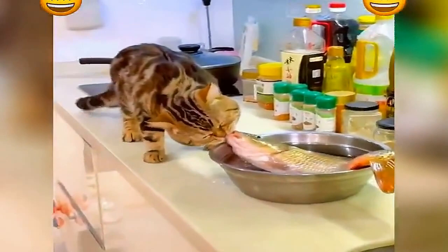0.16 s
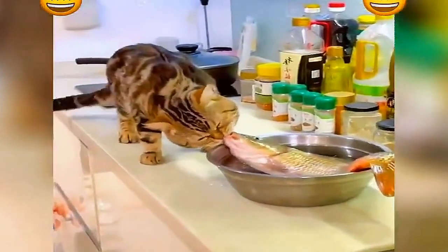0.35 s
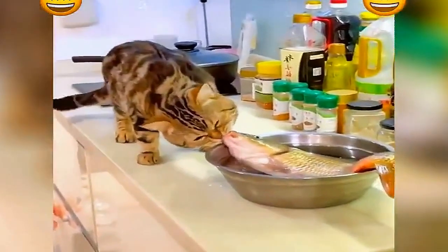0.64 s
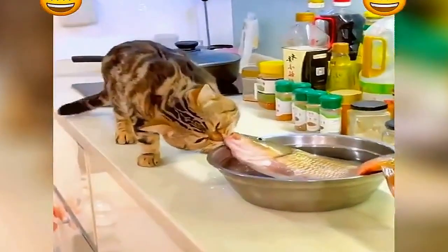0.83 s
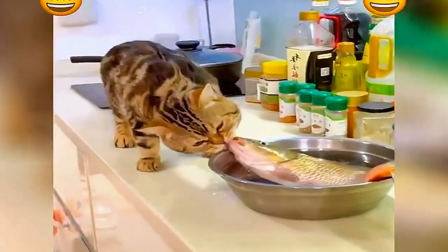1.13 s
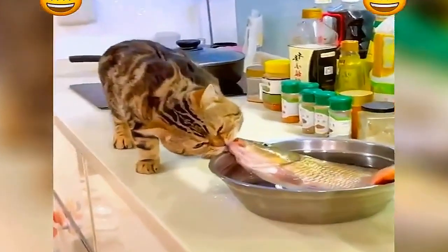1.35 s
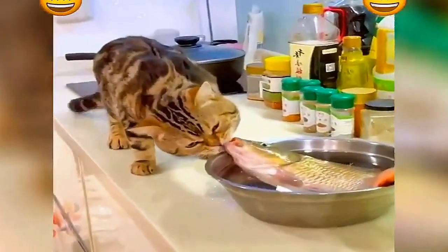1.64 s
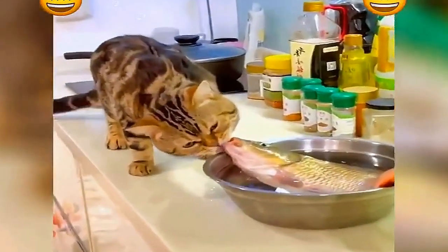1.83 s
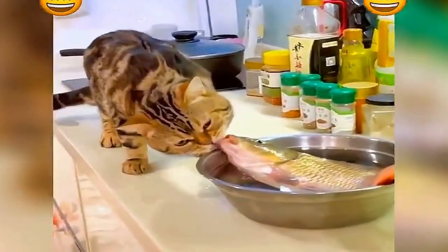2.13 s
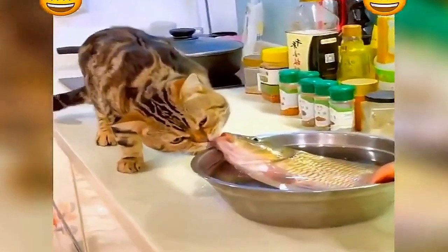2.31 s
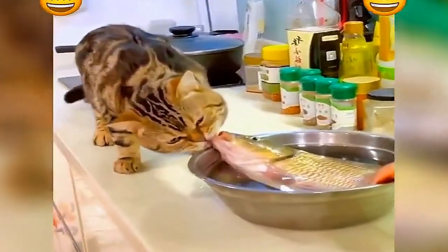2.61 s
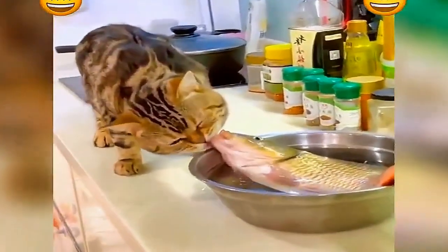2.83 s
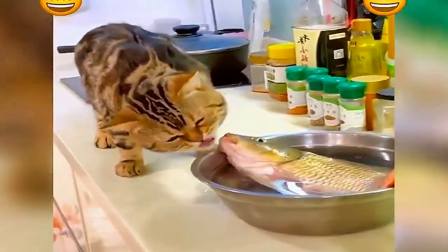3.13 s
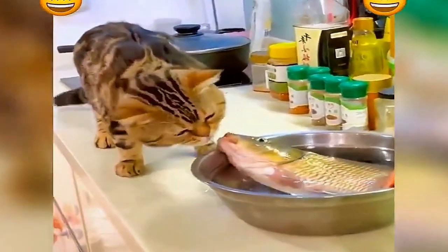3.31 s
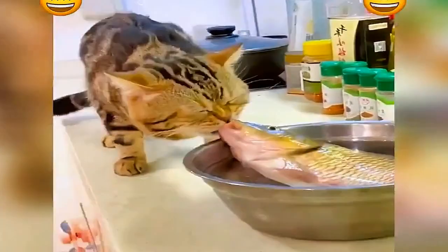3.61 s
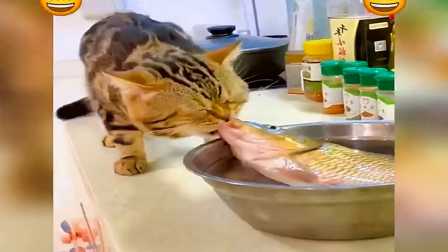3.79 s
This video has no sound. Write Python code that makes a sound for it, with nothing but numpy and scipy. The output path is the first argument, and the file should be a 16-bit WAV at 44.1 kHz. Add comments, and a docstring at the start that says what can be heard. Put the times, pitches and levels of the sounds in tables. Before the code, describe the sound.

A cat growls through a mouthful of raw fish, a low hum with rapid throaty flutter, from 0 to 1.1 seconds, 1.25 to 3.2, and 3.35 to the end. Chews briefly brighten it; wet clicks cluster around 1.3-2.0. Dull knocks fall near 0.9 and 2.2, sniffs near 1.3 and 3.3. The growl peaks harshly around 3.5, then breaks into a higher whine at 3.7. Close, dry kitchen, faint rumble.

```python
"""In a kitchen, a cat growls through its teeth while it gnaws a raw fish on the counter.
The growl is a low hum with rough pulses, shaken by a flutter in the throat; each chew opens the mouth
and lets the upper resonances out. It stops twice and at last breaks into a higher whine.
Noise bursts make the wet bites and two sharp ticks, random snaps the squelch, filtered noise the sniffs
and the room's faint rumble, and decaying low sines the knocks."""
import sys
import numpy as np
from scipy import signal
from scipy.fft import rfft, irfft
from scipy.io import wavfile
from scipy.ndimage import uniform_filter1d

SR = 44100
rng = np.random.default_rng(int(sys.argv[2]) if len(sys.argv) > 2 else 0)


def wav_record(signal):
    """Record a signal, one row per channel, as 16-bit PCM in the file named by sys.argv[1]."""
    frames = np.transpose(np.atleast_2d(signal))
    bounded = np.clip(frames, -1, 1)
    # unit amplitude maps onto the largest positive 16-bit level
    quanta = np.round(bounded * 32767).astype(np.int16)
    wavfile.write(sys.argv[1], SR, quanta)


N = 174195
T = np.arange(N) / SR  # seconds

# Glide of the growl's pitch. Each row: time in seconds, pitch in Hz before jitter.
GROWL_PITCH = [(0, 203), (.07, 236), (.13, 197), (.28, 203), (.335, 222), (.47, 179), (.53, 189), (.6, 177),
               (.645, 216), (.76, 173), (.88, 190), (.97, 208), (1.05, 194), (1.35, 182), (1.41, 160),
               (1.5, 187), (1.61, 186), (1.65, 170), (1.7, 184), (1.77, 166), (1.88, 161), (1.96, 207),
               (2.14, 166), (2.19, 188), (2.25, 170), (2.34, 208), (2.45, 165), (2.56, 182), (2.61, 165),
               (2.7, 170), (2.77, 184), (2.92, 161), (2.99, 196), (3.16, 181), (3.42, 175), (3.56, 201)]
# Swell of the growl's fundamental. Each row: time in seconds, level in dB before trim and waver.
HUM_LEVEL = [(0, -18), (.05, -22), (.24, -16), (.37, -20.5), (.55, -11.5), (.65, -22), (.78, -14),
             (.88, -13), (1.03, -23), (1.08, -19), (1.28, -25.5), (1.37, -21.5), (1.62, -20), (1.69, -13),
             (1.87, -20), (1.92, -12), (1.98, -21), (2.03, -15), (2.08, -20), (2.2, -13), (2.33, -19),
             (2.4, -14.5), (2.5, -18.5), (3.0, -17.5), (3.09, -13), (3.17, -15), (3.35, -22), (3.48, -13.5),
             (3.63, -18), (3.72, -46)]
# Ring of the throat. Each row: time in seconds, low resonances in dB, hollow resonance above them in dB.
THROAT_LEVELS = [(0, -27.5, -46), (.2, -32, -41), (.34, -28.5, -41), (.47, -33, -53), (.65, -29, -41.5),
                 (.8, -34, -41.5), (.98, -26.5, -37), (1.08, -40.5, -56), (1.26, -45, -59),
                 (1.6, -37.5, -52), (2.0, -30, -38), (2.2, -33.5, -42), (2.38, -28, -36), (2.55, -29, -38),
                 (2.849, -29.5, -37), (3.069, -27, -33), (3.351, -31, -40.5), (3.571, -22.5, -28),
                 (3.7, -28.5, -41), (3.92, -39, -34)]
# The closing whine. Each row: time in seconds, pitch in Hz, level in dB,
# brightening of the harmonics above the second in dB.
WHINE_GLIDE = [(3.66, 386, -29, -17), (3.82, 426, -21.5, -1), (3.87, 410, -23.5, -9),
               (3.9, 392, -22.5, -24), (3.95, 357, -21.5, -28)]
# Balance of the whine's harmonics, from the first up, before brightening. Each entry: level in dB.
WHINE_HARMONICS = [4, 2.5, 5, -1, -4.5, -29]
# Stretches of voice. Each row: start in seconds, end in seconds.
VOICE_PHRASES = [(-.05, 1.088), (1.24, 3.18), (3.345, 4.0)]
# Flutter of the throat. Each row: time in seconds, rate in beats per second before jitter.
FLUTTER_RATE = [(0, 56), (2.4, 58.8), (3.5, 66), (3.95, 65.4)]
# Chews. Each row: widest moment in seconds, opening in seconds, closing in seconds,
# mouth resonance in Hz, its level in dB, brightest upper resonance in Hz, its level in dB, squelch in dB.
CHEW_MOVES = [(0.109, 0.072, 0.1, 920, -33, 1430, -39.5, -52.5),
              (.37, 0.071, 0.14, 900, -34, 1490, -39, -51),
              (.71, 0.11, 0.1, 930, -36.5, 1580, -37.5, -48.5),
              (0.971, 0.079, 0.1, 904, -33, 1480, -38.5, -58),
              (1.481, 0.13, 0.085, 950, -41, 1980, -38, -50),
              (1.664, 0.039, 0.026, 967, -34.5, 1920, -34, -50),
              (1.769, 0.099, 0.049, 944, -33, 1730, -32.5, -47.5),
              (2.018, 0.13, 0.11, 953, -29, 1710, -31.5, -50),
              (2.391, 0.088, 0.082, 944, -23.5, 1630, -26.5, -57),
              (2.729, 0.09, 0.046, 967, -34, 1690, -38.5, -51),
              (3.00, 0.11, 0.033, 930, -31, 1550, -37, -54.5),
              (3.111, 0.099, 0.034, 957, -25, 1490, -28.5, -49.5),
              (3.479, 0.1, 0.058, 952, -23.5, 1500, -21, -53.5),
              (3.809, 0.21, .06, 925, -32, 1820, -37, -63)]
# Low resonances of the throat. Each row: centre in Hz, width in Hz, gain in dB.
LOW_MODES = [(328, 99, -0.5), (434.4, 56, -0.5), (524.5, 56.6, 1.5)]
# Hollow resonances of the throat. Each row: centre in Hz, width in Hz, gain in dB.
HOLLOW_THROAT_MODES = [(630, 78, 6), (733, 125, -2.1)]
# Upper resonances of the voice. Each row: centre in Hz, width in Hz, gain in dB.
BRIGHT_MODES = [(1440, 90, 5), (1676, 154, -1), (1930, 148, 0), (2220, 150, -2), (2480, 260, -6)]
# Colour of the wet squelch. Each row: centre in Hz, width in Hz, gain in dB.
WET_MODES = [(2880, 900, 1), (5000, 1700, -2), (7140, 400, -2)]
# Wet clicks of the teeth in the fish; the two near 3.46 s are sharp ticks of the overloaded loud growl.
# Each row: time in seconds, level in dB before trim, ring in Hz.
CLICKS = [(0.079, -28, 6050), (0.398, -28.5, 5800), (0.981, -28.5, 2180), (1.068, -28.5, 1430),
          (1.268, -26, 2050), (1.363, -26, 2560), (1.537, -26, 5820), (1.642, -27.5, 2980),
          (1.687, -28.5, 3350), (1.833, -17.5, 4900), (2.006, -28.5, 3350), (3.453, -24.5, 3270),
          (3.470, -30, 6060)]
# Dull knocks of the tugged fish. Each row: time in seconds, level in dB.
FISH_KNOCKS = [(0.932, -19), (2.241, -24.5)]
# Wet sniffs and slurps. Each row: start in seconds, length in seconds, level in dB before waver.
SNIFF_BREATHS = [(1.247, 0.042, -53), (1.353, 0.078, -42), (3.265, 0.093, -40)]
# Colour of the sniffs. Each row: centre in Hz, width in Hz, gain in dB.
BREATH_MODES = [(1270, 740, -0.5), (2330, 930, 1.5), (3060, 400, 4), (6640, 560, -10.5)]
# Colour of the room noise. Each row: frequency in Hz, relative level in dB per Hz.
ROOM_COLOUR = [(15, -20.5), (31, 1), (46, -5.5), (72, -11.5), (130, -6), (300, -20.5), (600, -33),
               (1500, -37.5), (4000, -43), (7000, -43), (9000, -60.5)]

# pitch and flutter jitter are fractions of the rate
HUM_JITTER, FLUTTER_JITTER = .035, .1
# the hum is unstrained from FULL_HUM_DB up, fully strained STRAIN_RANGE_DB below it
FULL_HUM_DB, STRAIN_RANGE_DB = -11, 8
# at full strain: depth of the level shake, phase sway in radians, fast random level waver
HUM_SHAKE, HUM_SWAY_RAD, HUM_WAVER_DB = .65, .35, 2.4
HUM_TRIM_DB = -0.99
PUFFS_PER_CYCLE, PUFF_JITTER_S, PUFF_SCATTER_DB = 1.25, .0002, 3.2
RASP_GAIN, RASP_DECAY_S = .48, .003
BREAK_S, BREAK_LENGTH_S, VOICE_FADE_S = 3.675, .025, .03
JAW_SHAPE = 4.2  # exponent: higher holds the mouth open flatter and shuts it more steeply
CLOSED_MOUTH_DB = -11.5  # relative to the low throat
CLOSED_UPPER_DB = -50
OPEN_THROAT_HZ, OPEN_THROAT_WIDTH_HZ = 536, 37
MOUTH_WIDTH_HZ, CHEEK_RATIO, CHEEK_WIDTH_HZ = 93, 1.257, 122
UPPER_FOCUS_WIDTH_HZ, UPPER_LAG_S, UPPER_NARROWING = 580, .0063, .73
ROOM_NOISE_DB, ROOM_T60_S, ROOM_RING_DB = -33, .077, -4
SNAPS_PER_S, SNAP_SPREAD_DB = 1500, 8.5
CLICK_RISE_S, CLICK_T60_S, CLICK_Q, CLICK_BROAD_GAIN, CLICK_TRIM_DB = .001, .024, 5, .26, -2.5
KNOCK_HZ, KNOCK_WIDTH_HZ = 81, 4.5
SNIFF_FADE_S, SNIFF_WAVER_DB = .0096, 2
WHINE_SLIP_CYCLES, WHINE_WAVER_DB = .14, 2
OVERLOAD, CUTOFF_HZ = .7, 7800  # overload is in full-scale amplitude


def from_db(db):
    """Decibels to gain."""
    return 10 ** (np.asarray(db) / 20)


def rms_one(x):
    """Scale to rms 1."""
    return x / np.sqrt(np.mean(x ** 2) + 1e-20)


def curve(rows):
    """Join (seconds, value) rows by straight lines."""
    return np.interp(T, *np.transpose(rows))


def drift(hz):
    """Random wander of rms 1, from noise rolled off above hz."""
    spectrum = rfft(rng.standard_normal(N))
    return rms_one(irfft(spectrum / (1 + (np.fft.rfftfreq(N, 1 / SR) / hz) ** 2), N))


def even(x):
    """Hold the level near rms 1 over a few flutter beats."""
    power = uniform_filter1d(uniform_filter1d(x * x, size=1500), size=1500)
    return x / np.sqrt(np.abs(power) + 1e-12)


def band(x, low_hz, high_hz, order=2):
    """Band-pass."""
    return signal.sosfilt(signal.butter(order, [low_hz, high_hz], "band", fs=SR, output="sos"), x)


def resonate(x, hz, width):
    """One two-pole resonance, gain about 1 on top."""
    r = np.exp(-np.pi * width / SR)
    numerator = np.array([1, 0, -1]) * (1 - r * r) / 2
    denominator = [1, -2 * r * np.cos(2 * np.pi * hz / SR), r * r]
    return signal.lfilter(numerator, denominator, x + 1e-18)


def body(x, modes):
    """Resonances in parallel, signs alternating."""
    return sum((-1) ** k * from_db(db) * resonate(x, hz, width) for k, (hz, width, db) in enumerate(modes))


def ramp(seconds, length):
    """Straight fade from 0 to 1, halfway up where seconds is zero."""
    return np.clip(seconds / length + .5, 0, 1)


def jaw(at, opening, closing):
    """One chew: the mouth opens to 1 and shuts, each side at its own speed."""
    side = np.where(T < at, opening, closing)
    return np.exp(-np.abs((T - at) / side) ** JAW_SHAPE)


def beat_gate(beats):
    """The throat pinches shut briefly around the start of every flutter beat."""
    return 1 - np.cos(np.pi * beats) ** 4


def growl_hum(cycles, beats):
    """The fundamental is a sine that the flutter shakes more as it is squeezed thin."""
    strain = np.clip((FULL_HUM_DB - curve(HUM_LEVEL)) / STRAIN_RANGE_DB, 0, 1)
    sway = strain * HUM_SWAY_RAD * np.sin(2 * np.pi * beats)
    shake = 1 - strain * HUM_SHAKE * (1 - beat_gate(beats))
    hum = np.sin(2 * np.pi * cycles - sway) * shake
    waver_db = HUM_WAVER_DB * strain * drift(70)
    return even(hum) * from_db(curve(HUM_LEVEL) + HUM_TRIM_DB + waver_db)


def rattle(cycles, beats):
    """Every flutter beat sets the folds going afresh for a few uneven puffs, each with a burst of rasp."""
    beat_starts = np.diff(np.floor(beats), prepend=0)
    since_beat = cycles - np.maximum.accumulate(cycles * beat_starts)
    starts = np.flatnonzero(np.diff(np.floor(PUFFS_PER_CYCLE * since_beat + .5)) > 0)
    late, size = rng.standard_normal((len(starts), 2)).T
    pinch = np.clip(1 + drift(17)[starts], 0, 2)  # the closure comes and goes
    pulses = np.zeros(N)
    places = np.clip(starts + (late * PUFF_JITTER_S * SR).astype(int), 0, N - 1)
    pulses[places] = beat_gate(beats[starts]) ** pinch * from_db(PUFF_SCATTER_DB * size)
    puffs = signal.lfilter([1], [1, -np.exp(-1 / (RASP_DECAY_S * SR))], pulses)
    return even(pulses) + RASP_GAIN * even(puffs * rng.standard_normal(N))


def throat(source):
    """Low and hollow resonances colour the source; each chew opens one more."""
    low_db = curve(np.array(THROAT_LEVELS)[:, :2])
    hollow_db = curve(np.array(THROAT_LEVELS)[:, ::2])
    gape = sum(jaw(*chew[:3]) for chew in CHEW_MOVES)
    opened = resonate(band(source, 320, 700), OPEN_THROAT_HZ, OPEN_THROAT_WIDTH_HZ)
    low = band(body(source, LOW_MODES), 313, 512) + gape * opened
    hollow = band(body(source, HOLLOW_THROAT_MODES), 580, 935)
    return even(low) * from_db(low_db) + even(hollow) * from_db(hollow_db)


def mouth(source):
    """The closed mouth muffles; each chew lets its cavity and the upper resonances ring out."""
    middle = band(source, 685, 1248, order=3)
    bright = band(body(source, BRIGHT_MODES), 1320, 2900)
    low_db = curve(np.array(THROAT_LEVELS)[:, :2])
    out = even(middle) * from_db(low_db + CLOSED_MOUTH_DB) + even(bright) * from_db(CLOSED_UPPER_DB)
    for at, opening, closing, hz, mouth_db, upper_hz, upper_db, _ in CHEW_MOVES:
        cavity = body(middle, [(hz, MOUTH_WIDTH_HZ, 0), (hz * CHEEK_RATIO, CHEEK_WIDTH_HZ, 0)])
        out = out + even(cavity) * from_db(mouth_db) * jaw(at, opening, closing)
        # the upper resonances open a little later and more briefly
        focus = even(resonate(bright, upper_hz, UPPER_FOCUS_WIDTH_HZ)) * from_db(upper_db)
        out = out + focus * jaw(at + UPPER_LAG_S, opening * UPPER_NARROWING, closing * UPPER_NARROWING)
    return out


def growl():
    """The voice: its direct tone, and the rattle (noise after the break) ringing in throat and mouth."""
    cycles = np.cumsum(curve(GROWL_PITCH) * (1 + HUM_JITTER * drift(90))) / SR
    beats = np.cumsum(curve(FLUTTER_RATE) * (1 + FLUTTER_JITTER * drift(26.5))) / SR
    hum = growl_hum(cycles, beats)
    broken = ramp(T - BREAK_S, BREAK_LENGTH_S)
    breath = beat_gate(beats) * rng.standard_normal(N)
    source = (1 - broken) * rattle(cycles, beats) + broken * breath
    voiced = sum(ramp(np.minimum(T - start, end - T), VOICE_FADE_S) for start, end in VOICE_PHRASES)
    tone = hum + broken * whine(beats)
    return voiced * tone, -voiced * (throat(source) + mouth(source))


def room_noise():
    """Steady noise shaped into a rumble with a faint hiss."""
    hz, db = np.transpose(ROOM_COLOUR)
    colour = from_db(np.interp(np.log(np.fft.rfftfreq(N, 1 / SR) + 1), np.log(hz), db))
    return from_db(ROOM_NOISE_DB) * rms_one(irfft(rfft(rng.standard_normal(N)) * colour, N))


def kitchen(x):
    """Short diffuse ring of the hard walls, from a decaying noise tail."""
    t = T[:SR // 2]
    tail = rng.standard_normal(len(t)) * from_db(-60 * t / ROOM_T60_S) * (t > .003)
    return from_db(ROOM_RING_DB) * signal.fftconvolve(x, tail / np.linalg.norm(tail))[:N]


def squelch():
    """Tiny wet snaps of flesh, random in time, sign and size, while the jaw works."""
    snaps = (rng.random(N) < SNAPS_PER_S / SR) * rng.choice([-1, 1], N)
    grains = snaps * from_db(SNAP_SPREAD_DB * np.minimum(rng.exponential(1, N), 4))
    level = sum(from_db(db) * jaw(at, opening, closing) for at, opening, closing, *_, db in CHEW_MOVES)
    return rms_one(body(grains, WET_MODES)) * level


def bites_and_ticks():
    """Each bite or overload tick is a short crackle of noise through one resonance."""
    out = np.zeros(N)
    for at, db, hz in CLICKS:
        decay = from_db(-60 * np.maximum(T - at, 0.) / CLICK_T60_S)
        burst = rng.standard_normal(N) * ramp(T - at, CLICK_RISE_S) * decay
        # makes up for the energy a narrow resonance loses
        ring = resonate(burst, hz, hz / CLICK_Q) * np.sqrt(SR * CLICK_Q / (np.pi * hz))
        click = ring + CLICK_BROAD_GAIN * band(burst, 1300, 4700)
        out += from_db(db + CLICK_TRIM_DB) * click
    return out


def knocks():
    """Soft low thuds on the counter, each a decaying sine."""
    out = np.zeros(N)
    for at, db in FISH_KNOCKS:
        decay = (T > at) * np.exp(-np.pi * KNOCK_WIDTH_HZ * np.abs(T - at))
        out += from_db(db) * decay * np.sin(2 * np.pi * KNOCK_HZ * (T - at))
    return out


def sniffs():
    """Air drawn past the wet mouthful: resonant noise with a wavering level."""
    level = sum(from_db(db) * ramp(np.minimum(T - at, at + length - T), SNIFF_FADE_S)
                for at, length, db in SNIFF_BREATHS)
    air = rms_one(body(rng.standard_normal(N), BREATH_MODES))
    return air * level * from_db(SNIFF_WAVER_DB * drift(80))


def whine(beats):
    """Sharp high pulses, chopped by the flutter and knocked out of step by every beat."""
    rows = np.array(WHINE_GLIDE)
    hz, db, upper_db = (curve(rows[:, [0, k]]) for k in (1, 2, 3))
    slip = WHINE_SLIP_CYCLES * rng.standard_normal(N)[beats.astype(int)]  # one draw per beat
    phase = 2 * np.pi * (np.cumsum(hz) / SR + slip)
    tone = sum(from_db(level + upper_db * (k > 2)) * np.cos(k * phase)
               for k, level in enumerate(WHINE_HARMONICS, 1))
    return even(tone * beat_gate(beats) * from_db(WHINE_WAVER_DB * drift(200))) * from_db(db)


def scene():
    """The cat close by, in its kitchen; the direct tone stays out of the wall ring."""
    tone, voice = growl()
    cat = voice + bites_and_ticks() + squelch() + sniffs()
    return (tone + cat + kitchen(cat) + knocks() + room_noise())[None]


def record(dry):
    """Peaks beyond the overload level are clipped flat and the top is cut."""
    clipped = np.clip(dry, -OVERLOAD, OVERLOAD)
    return signal.sosfilt(signal.butter(14, CUTOFF_HZ, fs=SR, output="sos"), clipped)


dry = scene()
out = record(dry)
wav_record(out)
```